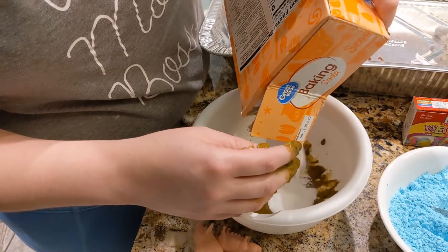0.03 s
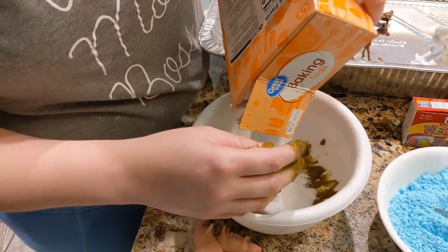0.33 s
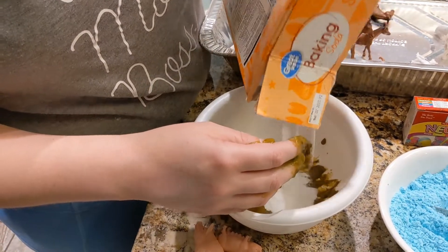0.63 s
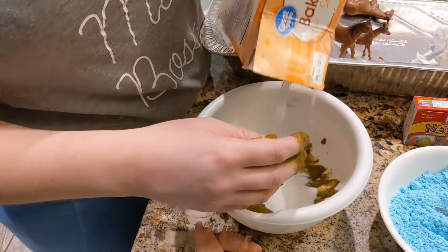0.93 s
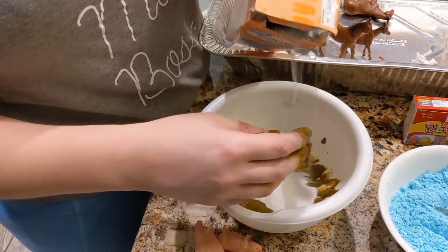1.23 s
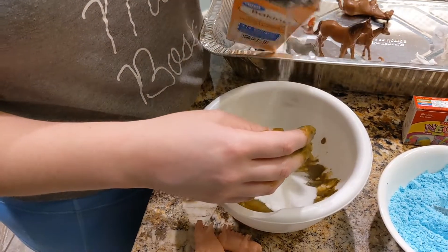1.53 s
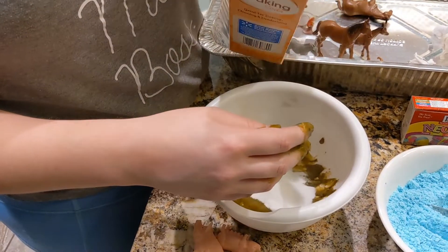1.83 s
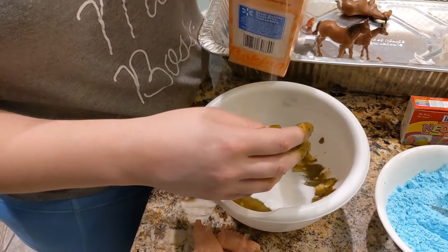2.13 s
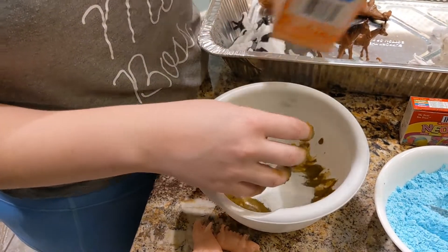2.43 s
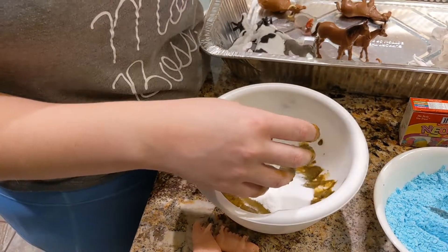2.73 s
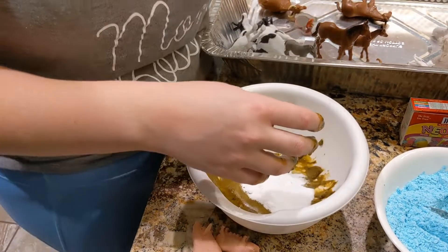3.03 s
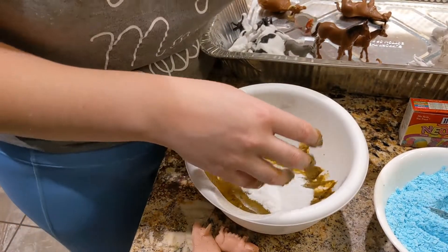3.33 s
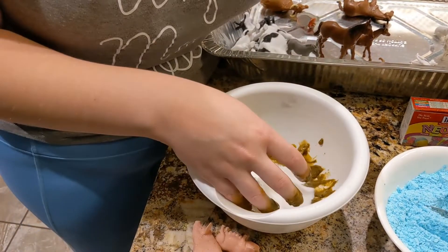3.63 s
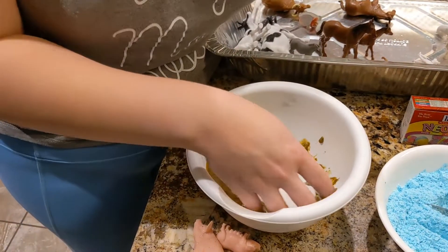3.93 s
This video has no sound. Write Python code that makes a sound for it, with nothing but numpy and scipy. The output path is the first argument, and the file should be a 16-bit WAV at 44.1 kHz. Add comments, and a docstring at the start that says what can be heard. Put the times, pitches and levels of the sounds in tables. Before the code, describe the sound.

A cardboard box of powder is tapped lightly a few times in the first second. From about 1.3 to 2 seconds it is shaken, with hollow knocks and papery rattling. It creaks and bumps onto the counter between 2.1 and 2.9 seconds. From 3 seconds, fingers softly brush powder while a plastic bowl knocks and rubs on the counter. Everything is close, over a small kitchen's low hum.

```python
"""Powder box and mixing bowl

A cardboard box of powder is tapped over a plastic bowl, knocked, shaken and put away. Each hit
makes it ring briefly, and it creaks as it sticks and slips in the grip. Fingers then work the
powder in the bowl, which rubs and bumps on the counter. A small kitchen hums behind.
The microphone is close, and its left side is brighter."""
import sys
import numpy as np
from scipy import signal
from scipy.fft import rfft, irfft, next_fast_len
from scipy.io import wavfile

SR = 44100
rng = np.random.default_rng(int(sys.argv[2]) if len(sys.argv) > 2 else 0)


def file_out(sig):
    """Save sig as 16-bit WAV at sys.argv[1]."""
    # one column per channel
    cols = np.atleast_2d(sig).T
    # limit, then scale
    lim = np.clip(cols, -1, 1)
    pcm = np.round(lim * 32767).astype(np.int16)
    wavfile.write(sys.argv[1], SR, pcm)


N = 176400
T = np.arange(N) / SR
RING_T = np.arange(SR // 3) / SR  # the clock for a single hit

# Levels are relative. A fade_s is the time a sound takes to drop by 60 dB.
# Finger taps on the box: start_s, level_db, bass_db
TAPS = [(.038, -27, 0.5), (0.2062, -36, -20), (0.2219, -27.5, 1), (0.583, -30, 1.5), (.5965, -38, -7),
        (.602, -31.5, 7.5), (0.762, -41, -1.5), (1.397, -36, -14), (2.0338, -38.5, -16)]
# Tones of the tapped panel: pitch_hz, level_db, fade_s
PANEL_TONES = [(206, -2, 0.039), (315, -2, 0.04), (404, -5, 0.038), (545, -9, 0.033), (684, -21, 0.03),
               (930, -18.5, 0.029), (1136, -13, 0.022), (1334, -12, 0.014), (1980, -24, 0.0077)]
# Hollow knocks of the whole box: start_s, level_db, rattle_db, thump_db
KNOCKS = [(1.258, -27, -5, -6), (1.2712, -30.5, -7, -2.5), (1.2845, -44, 2, -11), (1.647, -39, -0.5, -18),
          (1.664, -43.5, -1, 11), (1.754, -37.5, -2.5, -19), (1.7605, -46, 2, -16), (1.774, -41, -5, -13)]
# Tones of the box walls: pitch_hz, level_db, fade_s
WALL_TONES = [(218, -9, 0.12), (308, -0.5, 0.1), (394, -19, 0.049), (451.4, -12, 0.11), (519, -9, 0.06),
              (592, -1.5, 0.065), (720, -16, 0.05), (746, -13, 0.069), (994, -21, 0.038),
              (1360, -22, 0.044)]
# Rattle of the contents: pitch_hz, level_db
RATTLE_COLOUR = [(100, -21), (300, 4.5), (650, 2), (1000, -8), (1600, -17.5), (2700, -19), (3600, -28.5),
                 (11000, -38.5), (15500, -42)]
# Bumps of the box being set down: start_s, level_db, crack_db, bass_db
BUMPS = [(2.264, -35, -4.5, 2), (2.275, -36, -4, 6), (2.335, -28, -10.5, -6), (2.343, -35.5, -18, 11.5),
         (2.537, -31.5, -18, 5), (2.561, -41, -4, 10), (2.604, -33.5, -12, 1), (2.622, -41.5, 3, 13),
         (2.64, -44, -25, 16), (2.702, -29.5, -2.5, 6), (2.717, -31.5, -14, 5.5), (2.751, -34.5, -1, 5),
         (2.769, -31, -13, 3), (2.806, -39, -12, 17.5), (2.8868, -27.5, -5.5, -2)]
# Tones of the box meeting the counter: pitch_hz, level_db, fade_s
COUNTER_TONES = [(109, -22, 0.18), (175, -4.5, 0.085), (254, -8.5, 0.07), (411, -3, 0.027),
                 (476.5, -2, 0.06), (562, -6, 0.072), (710, -5, 0.028), (890, -17.5, 0.026),
                 (1293, -9, 0.028)]
# Crack of a hard hit: pitch_hz, level_db
CRACK_COLOUR = [(300, 9.5), (800, 4.5), (1400, 4.5), (1800, -1), (2400, 6), (3300, -12), (3950, -5),
                (5000, -16.5), (11000, -24), (15500, -19)]
# Tones of the box's stiff corner: pitch_hz, level_db, fade_s
CORNER_TONES = [(2157, -10, 0.031), (2380, -1.5, 0.014), (3906, -10.5, .025)]
# Snaps of the flap and loose grains: start_s, level_db, paper_db, paper_pitch_ratio, paper_fade_s
SNAPS = [(0.602, -64.5, 9.5, 1.27, .03), (0.636, -63, -10, 2, .06), (1.429, -45, -23, 2.7, .06),
         (1.456, -48.5, 4, 2.67, .03), (1.4575, -57, 9, 1.52, 0.023), (1.538, -61.5, 3, 0.94, .06),
         (1.666, -55, 4, 1.8, 0.13), (1.69, -63, 11, 1.4, 0.054), (1.707, -46.5, 4, 1.16, 0.063),
         (1.714, -54, 5, 1.4, .05), (1.76, -47.5, -6, 1, .05), (1.778, -53.5, 4, 1.04, 0.065),
         (1.793, -62, 1, 2, 0.068), (1.818, -46, 1, 1.5, 0.032), (1.823, -50, 4.5, 0.92, 0.081),
         (1.8725, -48, 4.5, 1.05, 0.064), (1.916, -54.5, 3, 1.2, 0.08), (2.274, -55.5, -12, 1.5, 0.048),
         (2.283, -59.5, 7, 1.6, 0.047), (2.333, -55.5, -2, 2.6, 0.048), (2.559, -66, 7, 2.4, 0.044),
         (2.886, -56.5, -11, 2.2, .06), (3.3095, -52, -2.5, 1.6, .04), (3.327, -60.5, 5, 1.3, .06),
         (3.475, -62, -5, 2, .03), (3.531, -62, 4, 2.1, .03), (3.62, -62, 7, 2.9, .03),
         (3.671, -50.5, 4, 2.04, 0.028), (3.963, -62, -20, 2, .04)]
# Bright tick of a snap, with the microphone's own high ringing peaks: pitch_hz, level_db
TICK_AND_MIC_COLOUR = [(1000, -12), (3000, 0), (5000, -38), (6500, 9), (8000, -2.5), (9700, 8.5),
                       (10700, -5), (11800, 9.5), (13300, -12), (15500, 6)]
# Papery rattle of a snap: pitch_hz, level_db
PAPER_COLOUR = [(300, -3), (1100, 2), (1460, 13), (1700, -4), (1950, 8), (2500, -4.5), (3000, -4),
                (3700, -8), (5500, -18), (12000, -41)]
# Spells of creaking: start_s, end_s, first_slips_per_s, last_slips_per_s, first_db, last_db
CREAKS = [(2.1125, 2.147, 31.5, 33, -45.5, -48), (2.16, 2.265, 60, 104, -44.5, -38.5),
          (2.264, 2.272, 96, 90, -39, -42), (2.29, 2.335, 83, 107, -43, -46),
          (2.362, 2.41, 72, 102, -39.5, -40), (2.417, 2.454, 91, 70, -45, -56),
          (2.479, 2.485, 53, 47, -44.5, -42), (2.4915, 2.525, 256, 190, -39, -39),
          (2.536, 2.542, 294, 300, -40, -38), (2.561, 2.563, 260, 330, -37, -36),
          (2.597, 2.605, 246, 249, -43.5, -29), (2.62, 2.67, 110, 110, -36.5, -42),
          (2.693, 2.79, 90, 140, -40, -49.5), (2.866, 2.879, 106, 100, -43, -43),
          (2.911, 3.053, 113, 97, -57, -52)]
# Tones of the gripped cardboard: pitch_hz, level_db, fade_s
GRIP_TONES = [(112, -16.5, 0.23), (195.5, -6.5, 0.15), (485, -10, 0.038), (600, -5.5, 0.024),
              (770, -1, 0.018), (960, -5, 0.016), (1280, -5.5, 0.019), (1410, -11.5, 0.0086),
              (2310, -27, .012)]
# Fibres tearing loose at each slip: pitch_hz, level_db
RASP_COLOUR = [(300, -6), (800, -0.5), (1300, -5), (1900, -12), (3000, -22.5), (6000, -32), (12000, -42)]
# Loudness of the shaking: time_s, level_db
SHAKE_LEVELS = [(1.25, -82), (1.28, -52.5), (1.37, -60.5), (1.45, -56), (1.47, -58), (1.56, -60.5),
                (1.635, -72.5), (1.662, -47.5), (1.74, -50), (1.775, -45.5), (1.82, -50.5), (1.86, -55),
                (1.92, -60), (2.02, -71), (2.2, -62.5), (2.29, -60), (2.45, -64), (2.75, -58.5),
                (2.95, -71), (3.1, -75)]
# Hiss of sliding powder and card: pitch_hz, level_db
SLIDE_COLOUR = [(150, 6.5), (300, 8.5), (400, 3.5), (580, -2), (880, -1.5), (1200, 1), (1460, -3),
                (1700, -20), (1950, -5.5), (2500, -5.5), (3000, -11), (3600, -14.5), (4800, -14.5),
                (8000, -19.5), (9700, -21), (10700, -20), (11700, -20.5), (13500, -28), (15500, -31)]
# Tones of the open flap: pitch_hz, level_db, fade_s
FLAP_TONES = [(623, 2.5, .035), (1457, -1.5, 0.046), (1697, -7, 0.059), (2008, -7.5, 0.025),
              (2537, -7.5, 0.045), (2883, -6.5, 0.033), (3820, -11, 0.03), (6600, -21, 0.0078)]
# Nudges of the bowl: start_s, level_db, crack_db
NUDGES = [(2.979, -41, -15), (3.022, -35.5, -14.5), (3.176, -46, -23), (3.264, -46, -20),
          (3.3096, -32.5, -12), (3.37, -37.5, -27), (3.53, -39, -6), (3.62, -45.5, 1), (3.892, -47, -29)]
# Tones of the plastic bowl: pitch_hz, level_db, fade_s
BOWL_TONES = [(287, -8, 0.034), (451, -1.5, 0.053), (566, 1.5, 0.026), (693, 0, 0.034), (830, -16, 0.02),
              (1300, -17, 0.016)]
# Loudness of fingers brushing the powder: time_s, level_db
BRUSH_LEVELS = [(2.1, -81), (2.6, -71.5), (3.2, -66.5), (3.33, -63.5), (3.4, -64.5), (3.47, -60.5),
                (3.58, -63.5), (3.66, -57.5), (3.72, -53.5), (3.77, -53.5), (3.83, -61), (3.9, -68),
                (4, -63)]
# Hiss of the brushed powder: pitch_hz, level_db
POWDER_COLOUR = [(400, 12), (1000, 1), (2300, 6), (4000, -1), (8000, -6.5), (9700, -6.5), (10700, -8.5),
                 (11800, -5), (13500, -16), (15500, -10.5)]
# Loudness of the bowl rubbing on the counter: time_s, level_db
RUB_LEVELS = [(2.85, -82), (2.98, -58.5), (3.04, -57), (3.12, -65), (3.19, -57.5), (3.24, -68),
              (3.34, -52.5), (3.42, -60), (3.46, -51.5), (3.55, -60), (3.59, -59), (3.7, -59.5),
              (3.87, -72), (3.9, -54.5), (3.95, -75)]
# Low scrape of the bowl: pitch_hz, level_db
RUB_COLOUR = [(150, 0), (380, -9.5), (460, -7.5), (560, -6.5), (690, -1.5), (850, -12.5), (1400, -14.5),
              (2500, -28.5), (6000, -60)]
# Soft thud of the hand pressing down: pitch_hz, level_db
THUD_COLOUR = [(20, -29), (45, 5), (65, 8), (110, -6.5), (160, 3), (260, -37), (600, -87)]
# The kitchen's echo: pitch_hz, fade_s
ECHO_FADES = [(150, 0.13), (1000, 0.45), (4000, 0.37), (12000, 0.16)]
# Fuzzy tones of the kitchen's hum: pitch_hz, width_hz, level_db
HUM_TONES = [(69.9, 7.5, -53), (107.2, 1.6, -57.5), (161.3, 22.7, -51.5), (205.2, 13.4, -59),
             (253.5, 14.8, -56.5), (323.7, 28, -65.5)]
# Steady rush of room air: pitch_hz, level_db
AIR_COLOUR = [(20, -43), (38, -3), (55, -4), (85, -2.5), (130, -15), (180, -4.5), (290, 1), (370, -16.5),
              (600, -22.5), (1000, -29), (1800, -32.5), (4000, -36), (8000, -43), (9800, -37.5),
              (10800, -44), (11800, -42), (13500, -49), (15500, -47)]
# How alike left and right are (1 means the same): pitch_hz, likeness
STEREO_LIKENESS = [(30, 0.68), (150, 0.89), (600, 0.8), (1200, 0.46), (2500, 0.04), (6000, 0.071)]
# How much louder the left is than the right: pitch_hz, lead_db
LEFT_LEAD = [(300, 1.5), (2500, -0.5), (4400, 6.5), (8000, 12.5), (12000, 16.5), (15000, 1.5)]

CONTACT_S = 0.00029  # soft things take this long to meet
ONSET = 1 - np.exp(-(RING_T / CONTACT_S) ** 2)
BASS_HZ = 380  # a softer, heavier hit drives the tones below this harder


def box_taps(finger_hz=3000):
    """A fingertip taps powder out of the box; it is too soft to stir much above finger_hz."""
    out = np.zeros((2, N))
    for s, db, bass_db in TAPS:
        panel = ring(PANEL_TONES, vary_db=1, detune=.015, bass_db=bass_db)
        add(out, s, amp(db - 5.5) * (panel + amp(-6.5) * burst(RATTLE_COLOUR, fade_s=0.042)))
    soften = signal.butter(2, finger_hz, fs=SR, output="sos")
    return cardboard_bend(signal.sosfilt(soften, out))


def box_knocks(thump_hz=136.5, rise_s=0.0039, thump_fade_s=0.11):
    """The box is knocked: its walls ring, the contents rattle and the air inside thumps."""
    out = np.zeros((2, N))
    thump = np.sin(2 * np.pi * thump_hz * RING_T) * (1 - np.exp(-RING_T / rise_s))
    thump *= amp(-60 * RING_T / thump_fade_s)
    for s, db, rattle_db, thump_db in KNOCKS:
        walls = ring(WALL_TONES, vary_db=1, detune=.004)
        rattle = amp(rattle_db) * burst(RATTLE_COLOUR, fade_s=0.14)
        add(out, s, amp(db - 3.5) * (walls + rattle + amp(thump_db + 6.5) * thump))
    return out


def box_bumps():
    """The box meets the counter, each time with a crack that rings its corner."""
    out = np.zeros((2, N))
    for s, db, crack_db, bass_db in BUMPS:
        body = ring(COUNTER_TONES, vary_db=1.5, detune=0.015, bass_db=bass_db)
        crack = amp(0.5) * burst(CRACK_COLOUR, fade_s=0.053)
        corner = amp(-3.5) * ring(CORNER_TONES, vary_db=3.5, detune=.05)
        add(out, s, amp(db - 6.5) * (body + amp(crack_db) * (crack + corner)))
    return out


def flap_snaps():
    """The flap and loose grains tick with a papery rattle; the microphone adds high ringing peaks."""
    out = np.zeros((2, N))
    for s, db, paper_db, ratio, fade_s in SNAPS:
        tick = burst(TICK_AND_MIC_COLOUR, fade_s=0.023)
        paper = burst([(hz * ratio, level) for hz, level in PAPER_COLOUR], fade_s)
        add(out, s, amp(db) * (tick + amp(paper_db) * paper))
    return out


def grip_creaks(uneven=0.15, spread_db=2.9, rasp_db=-8):
    """Cardboard sticks and slips, faster in a tighter grip; each slip rasps and rings the panel."""
    out = np.zeros((2, N))
    panels = [ring(GRIP_TONES, vary_db=2.5, detune=0.05) for _ in range(16)]
    slips = [panel + amp(rasp_db) * burst(RASP_COLOUR, fade_s=0.015) for panel in panels]
    for start, end, first_rate, last_rate, first_db, last_db in CREAKS:
        draws, picks = rng.standard_normal((64, 2)), rng.integers(len(slips), size=64)
        s = start
        for (late, size), pick in zip(draws, picks):
            if s >= end:
                break
            rate = np.interp(s, [start, end], [first_rate, last_rate])
            db = np.interp(s, [start, end], [first_db, last_db]) + spread_db * size
            add(out, s + uneven * late / rate, amp(db - 1.5) * slips[pick])
            s += 1 / rate
    return cardboard_bend(out)


def cardboard_bend(x, lag_s=0.0031, bend_hz=373):
    """Low tones travel slower through cardboard, so every hit sweeps quickly downward."""
    return filtered(x, lambda hz: np.exp(-2j * np.pi * lag_s * bend_hz * (1 - np.exp(-hz / bend_hz))))


def box_shaking(lumps_per_s=110, lump_db=-5.5, spread_db=2):
    """Powder and card slide inside the box while lumps hit the flap at random times."""
    flaps = [ring(FLAP_TONES, vary_db=3, detune=.015) for _ in range(12)]
    gaps, sizes = rng.exponential(size=600), rng.standard_normal(600)
    picks = rng.integers(len(flaps), size=600)
    times, levels = np.transpose(SHAKE_LEVELS)
    rattle = np.zeros((2, N))
    for s, size, pick in zip(times[0] + np.cumsum(gaps) / lumps_per_s, sizes, picks):
        if s < times[-1]:
            db = np.interp(s, times, levels) + lump_db + spread_db * min(size, 2)
            add(rattle, s, amp(db) * flaps[pick])
    return rattle + amp(curve(SHAKE_LEVELS) - 1.5) * grains(SLIDE_COLOUR, per_s=290, spread_db=3.5)


def bowl_nudges():
    """The plastic bowl knocks dully as the hand shifts it."""
    out = np.zeros((2, N))
    for s, db, crack_db in NUDGES:
        bowl = ring(BOWL_TONES, vary_db=1.5, detune=0.0091)
        add(out, s, amp(db - 6.5) * (bowl + amp(crack_db) * burst(CRACK_COLOUR, fade_s=0.11)))
    return out


def hand_mixing(press_s=3.78, press_width_s=0.04, press_db=-39.5):
    """Fingers brush the powder, the bowl rubs on the counter and the hand presses down once."""
    brush = amp(curve(BRUSH_LEVELS)) * grains(POWDER_COLOUR, per_s=630, spread_db=2.0)
    rub = amp(curve(RUB_LEVELS)) * grains(RUB_COLOUR, per_s=220, spread_db=2.5)
    swell = np.exp(-.5 * ((T - press_s) / press_width_s) ** 2)
    return brush + rub + amp(press_db) * swell * noise(THUD_COLOUR)


def kitchen_echo(x, rise_s=0.0018):
    """The small room answers with a short echo, different on each side."""
    hz, t, bands = signal.stft(rng.standard_normal((2, SR // 2)), SR, nperseg=256)
    fades = amp(-60 * t / along(ECHO_FADES, hz)[:, None])
    tail = signal.istft(bands * fades, SR, nperseg=256)[1]
    tail = stereo(tail, lambda f: 1) * (1 - np.exp(-np.arange(tail.shape[1]) / SR / rise_s))
    return signal.fftconvolve(x, tail / np.linalg.norm(tail[0]), axes=1)[:, :N]


def kitchen_hum(air_db=-53.5):
    """Narrow bands of noise hum over the soft rush of the room's air."""
    hum = np.zeros((2, N))
    for hz, width, db in HUM_TONES:
        hum += amp(db) * stereo(rng.standard_normal((2, N)), lambda f: 1 / (1 + (2 * (f - hz) / width) ** 2))
    return hum + amp(air_db) * brighten_left(noise(AIR_COLOUR), amount=0.3)


def ring(tones, vary_db, detune, bass_db=0):
    """A struck object rings with fading tones, a little different at every hit."""
    out = np.zeros(len(RING_T))
    for k, (hz, db, fade_s) in enumerate(tones):
        louder, higher = rng.standard_normal(2)
        level_db = db + bass_db * (hz < BASS_HZ) + vary_db * louder
        wave = np.sin(2 * np.pi * hz * (1 + detune * higher) * RING_T)
        out += (-1) ** k * amp(level_db - 60 * RING_T / fade_s) * wave
    return ONSET * out


def burst(colour, fade_s):
    """A dying puff of noise."""
    return ONSET * noise(colour, size=len(RING_T)) * amp(-60 * RING_T / fade_s)


def grains(colour, per_s, spread_db):
    """Rubbing noise that comes in tiny bursts of uneven size."""
    sizes = amp(spread_db * np.interp(T * per_s, np.arange(N // 8), rng.standard_normal(N // 8)))
    return stereo(rng.standard_normal((2, N)) * sizes, lambda hz: amp(along(colour, hz)))


def noise(colour, size=N):
    """Stereo noise; its colour says how strong each pitch is."""
    return stereo(rng.standard_normal((2, size)), lambda hz: amp(along(colour, hz)))


def stereo(pair, gain):
    """Blend two unrelated signals into a partly alike left and right, at a standard level."""
    def blend(hz):
        angle = np.arccos(np.clip(along(STEREO_LIKENESS, hz), -1, 1)) / 2
        return gain(hz) * np.array([np.cos(angle), np.sin(angle)])
    mid, side = filtered(pair, blend)
    both = np.array([mid + side, mid - side])
    return both / np.sqrt(np.mean(both ** 2) + 1e-20)


def brighten_left(x, amount):
    """Turn the treble up on the left and down on the right."""
    return filtered(x, lambda hz: amp(amount * np.array([[.5], [-.5]]) * along(LEFT_LEAD, hz)))


def filtered(x, response):
    """Scale each frequency in x by response(hz)."""
    n = x.shape[-1]
    padded = next_fast_len(n + 4096)
    return irfft(rfft(x, padded) * response(np.fft.rfftfreq(padded, 1 / SR)), padded)[..., :n]


def amp(db):
    """Turn decibels into a gain."""
    return 10 ** (np.asarray(db) / 20)


def along(points, hz):
    """Read between a table's rows at any pitch, on a log scale."""
    pitches, values = np.transpose(points)
    return np.interp(np.log(hz + 1), np.log(pitches + 1), values)


def curve(rows):
    """Join (time_s, value) points with straight lines."""
    return np.interp(T, *np.transpose(rows))


def add(track, s, sound):
    """Mix a sound in at s seconds."""
    part = track[:, max(0, round(s * SR)):][:, :sound.shape[-1]]
    part += sound[..., :part.shape[1]]


def scene(echo_db=-7.5):
    """The box and bowl with their echo, brighter on the left, over the hum."""
    box = box_taps() + box_knocks() + box_bumps() + flap_snaps() + grip_creaks() + box_shaking()
    near = box + bowl_nudges() + hand_mixing()
    return brighten_left(near + amp(echo_db) * kitchen_echo(near), amount=1) + kitchen_hum()


def record(dry, low_hz=67, top_hz=15850):
    """The microphone loses the deepest bass and everything above top_hz."""
    low_cut = signal.butter(2, low_hz, "high", fs=SR, output="sos")
    return filtered(signal.sosfilt(low_cut, dry), lambda hz: hz < top_hz)


dry = scene()
out = record(dry)
file_out(out)
```